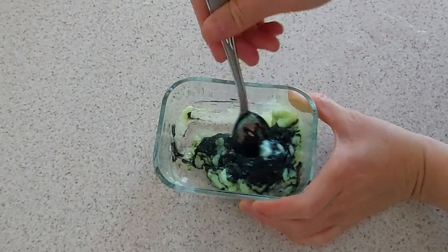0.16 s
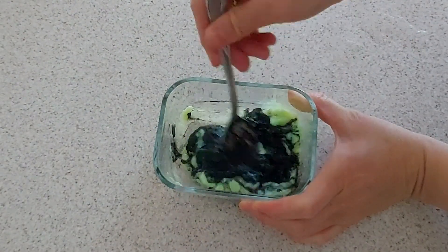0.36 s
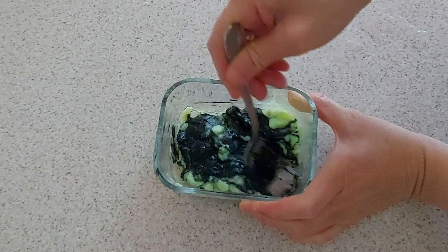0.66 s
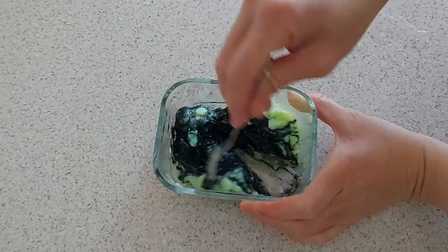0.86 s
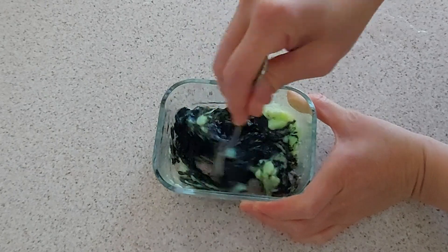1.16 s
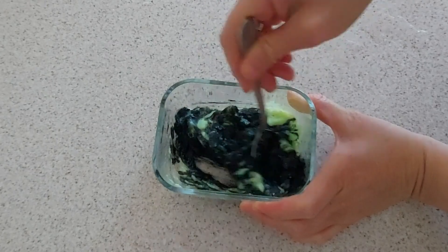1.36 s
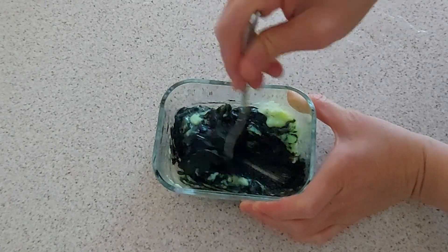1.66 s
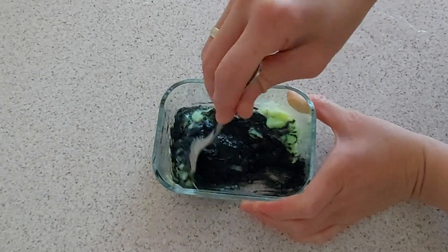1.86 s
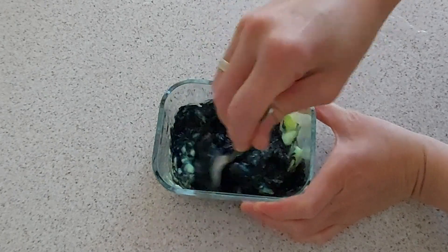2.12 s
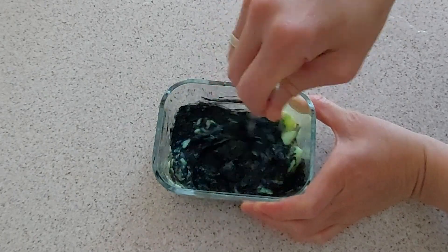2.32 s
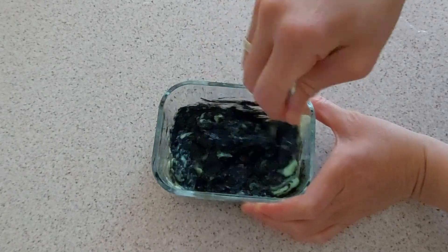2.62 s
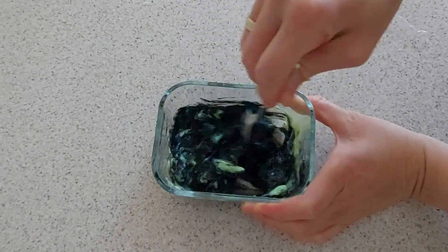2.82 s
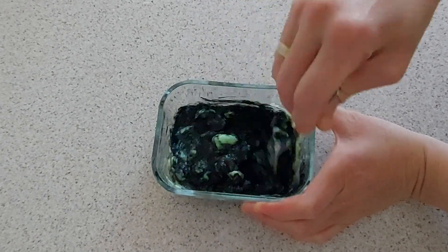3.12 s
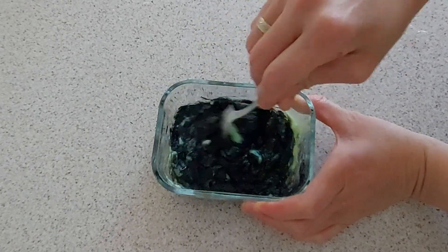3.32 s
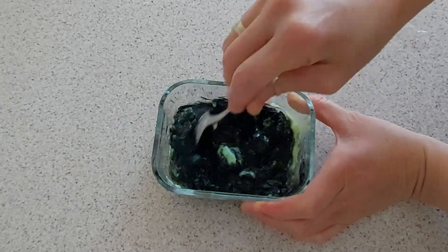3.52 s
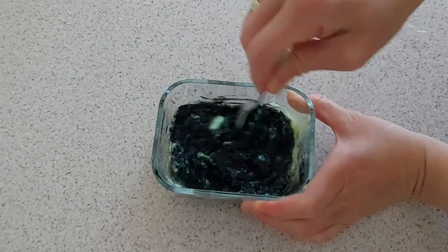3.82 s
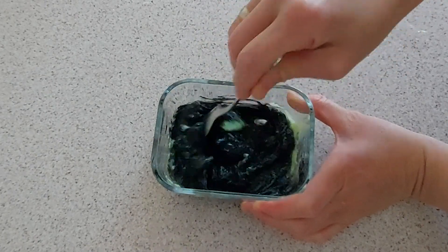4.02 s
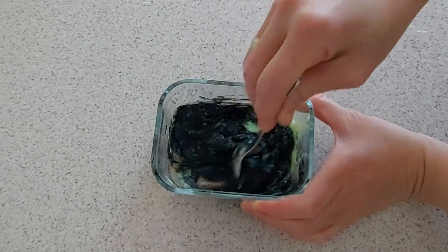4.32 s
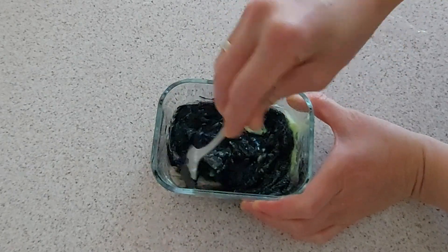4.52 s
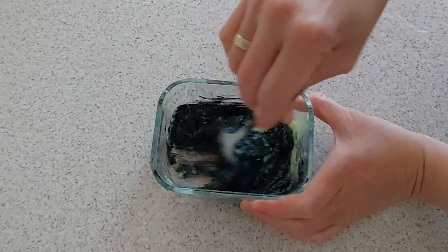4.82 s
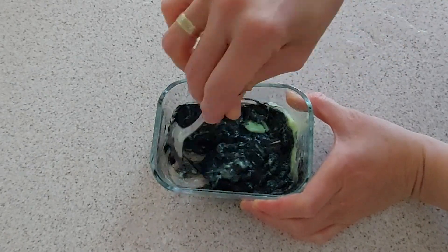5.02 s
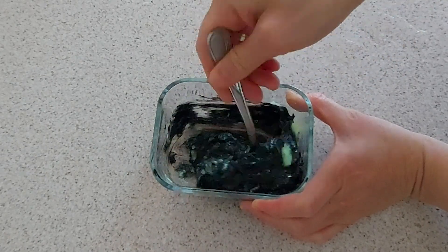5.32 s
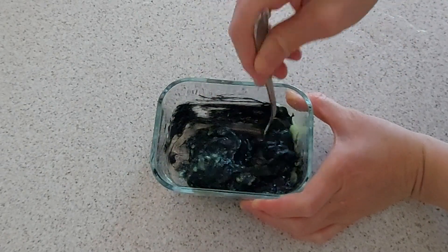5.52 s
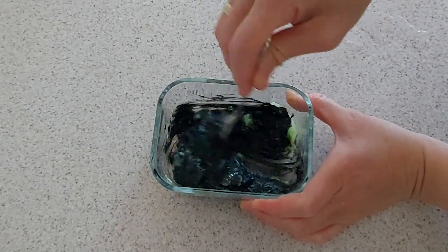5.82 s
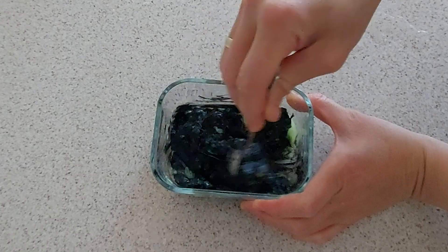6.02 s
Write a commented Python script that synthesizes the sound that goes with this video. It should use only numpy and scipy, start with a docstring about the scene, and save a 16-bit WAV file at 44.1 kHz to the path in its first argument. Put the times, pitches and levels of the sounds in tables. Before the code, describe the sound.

The squeaky tail of a knock fades first, then uneven spoon strikes clatter on heavy glass, dry and quickly damped by clinging paste. Bright hard taps alternate with woody bumps from the counter below. Small scraping squeals and tiny wet ticks slip between them. Stirring continues to the end, recorded closely in a small indoor room with soft low hum and rumble.

```python
"""A small quiet room with faint hum and rumble, and the squealing tail of a knock already dying away. A metal
spoon then stirs a soft paste in a thick glass dish that a hand holds on a kitchen counter. Knocks are noise
clatter, decaying modes and a thud on the counter; scrapes are gritty noise with a squeal. The strongest knocks
also send low noise thumps into the counter, and paste ticks are bright snaps; sparse random echoes make the
room. Two spaced microphones stand close by."""
import sys
import numpy as np
from scipy import signal
from scipy.fft import rfft, irfft, next_fast_len
from scipy.io import wavfile
from scipy.ndimage import uniform_filter1d

SR = 44100
rng = np.random.default_rng(int(sys.argv[2]) if len(sys.argv) > 2 else 0)


def materialize(psi):
    """Save the field psi as 16-bit PCM at rate SR to the path in sys.argv[1].

    A 1-D psi becomes a single channel; in a 2-D psi each row is a channel.
    """
    bounded = np.clip(np.atleast_2d(psi).T, -1, 1)
    quanta = np.round(bounded * 32767).astype(np.int16)
    wavfile.write(sys.argv[1], SR, quanta)


N = 272097  # length [samples]

# Modes of dish and spoon before the small random detuning: (frequency [Hz], part [index])
# parts: 0 long walls, 1 rim, 2 floor, 3 corners, 4 short walls of the dish, 5 spoon
MODE_PITCHES = [(2310, 0), (2372, 0), (4065, 1), (7960, 1), (6360, 4), (8700, 4), (10150, 4), (11200, 4),
                (4985, 5), (6950, 5), (14020, 4), (985, 2), (1382, 2), (1585, 2), (1738, 2), (3664, 3),
                (5557, 3)]
# The same modes in the same order: (relative level [dB], undamped time to fall 60 dB [s])
MODE_FADES = [(-8.5, 0.038), (-1.5, 0.054), (-3.5, 0.088), (-7, 0.12), (-2.5, 0.068), (-3.5, 0.044),
              (-10, 0.043), (-17, 0.025), (1, 0.073), (-6.5, 0.068), (-10, 0.034), (-13, 0.049), (4, 0.059),
              (4, 0.061), (0, 0.05), (-4.5, 0.059), (-15, 0.035)]
# Spectrum of the dense spoon-on-glass clatter: (frequency [Hz], relative level [dB per Hz])
CLATTER_SPECTRUM = [(120, -45), (200, -23), (600, -7), (1030, -6.5), (2330, -5), (3310, -11), (8490, -5),
                    (9480, -9), (11000, -3), (13700, -8), (16500, -26)]
# Spectrum of the counter under the pushed dish: (frequency [Hz], relative level [dB per Hz])
RUMBLE_SPECTRUM = [(20, -42), (40, -30), (55, -12), (70, 0), (100, 3), (160, -3), (240, -5.5), (400, -34.5)]

HUSH_DB, HUM_DB = -69, -68.5  # the hum's own level still wavers
BODY_DB, BODY_PER_THUD = -2.5, 0.55  # [dB], [dB per dB]: a blow aimed down at the counter has a fuller middle
SPOON_PER_BLOW = -0.28  # [dB per dB]: the spoon shows most in light taps
# Divisors of the ring times: a spoon that lands again soon and softer stays on the glass and mutes it
DAMPING, REBOUND_DAMPING = 1.175, 1.54
REBOUND_S = .1  # the longest gap before a rebound
KNOCK_PAN_DB = -0.16  # left minus right
GRIT_DB, GRITS_PER_S = 2.1, 3000  # mean size of a catch, mean number of catches
STROKE_FADE_DB = -1.5  # the edge bites first and eases off over the stroke
GRIP_S = 0.12  # the hand stills the dish: 20 dB more are gone after this time
# Short neighbours of each mode: level above it [dB], share of its t60, spread as a share of its pitch
BLUNT_DB, BLUNT_T60, BLUNT_SPREAD = 4, .3, 0.023
MIC_LOW_HZ, EDGE_HZ = 48.6, 16750  # bass and treble limits


def gain_of(db):
    """Decibels to amplitude."""
    return 10 ** (np.asarray(db) / 20)


def evened(x):
    """Scales to rms 1."""
    return x / np.sqrt(np.mean(x ** 2) + 1e-20)


def read(points, hz):
    """Reads a table on a log-frequency axis."""
    f, value = np.transpose(points)
    return np.interp(np.log(hz + 1), np.log(f + 1), value)


def add(mix, s, sound):
    """Mixes a two-channel sound in at time s."""
    part = mix[:, round(s * SR):][:, :sound.shape[1]]
    part += sound[:, :part.shape[1]]


def lumps(count, size, depth_db):
    """Smooth random gain, about size steps wide."""
    wander = evened(uniform_filter1d(rng.standard_normal(count), size=size))
    return gain_of(depth_db * wander)


def pair(count, level_db):
    """Noise at two spaced microphones, which agree in the bass only; level_db(hz) shapes it, rms is 1."""
    # Likeness of the left and right microphones: (frequency [Hz], likeness [0 to 1])
    likeness = [(60, 1), (300, 0.94), (700, 0.1), (2000, 0.045)]
    size = next_fast_len(count)
    hz = np.fft.rfftfreq(size, 1 / SR)
    left, other = rfft(rng.standard_normal((2, size)))
    same = np.clip(read(likeness, hz), 0, 1)
    right = same * left + np.sqrt(1 - same ** 2) * other
    noise = irfft(np.array([left, right]) * gain_of(level_db(hz)), size)
    return evened(noise[:, :count])


def dying(x, t60s):
    """Splits a noise into overlapping bands, each fading at its own speed."""
    count = x.shape[1]
    hz = np.fft.rfftfreq(count, 1 / SR)
    t = np.arange(count) / SR
    spectrum = rfft(x)
    centres = [f for f, _ in t60s]
    total = 0
    for weights, (_, t60) in zip(np.eye(len(t60s)), t60s):
        share = read(list(zip(centres, weights)), hz)
        total = total + irfft(spectrum * share, count) * gain_of(-60 * t / t60)
    return total


def background():
    """Steady room hush, rumble of the counter and a wavering two-tone hum that rises a little with it."""
    # Room hush: (frequency [Hz], relative level [dB per Hz])
    hush_spectrum = [(18, -48.5), (30, -35), (65, -18.5), (170, -8.5), (467, -21), (1620, -36.5),
                     (2100, -36.5), (9000, -45), (14100, -34), (16500, -49)]
    # Counter under the pushed dish: (time [s], level [dB])
    rumble_curve = [(0.0, -77), (1.576, -60.5), (1.962, -66), (2.651, -58), (5.121, -80), (6.17, -67)]
    # Centres of the two hum tones: [Hz]
    hum_pitches = [203, 250]

    def hum_tone_db(hz):
        power = sum(share / (1 + ((hz - f) / 3.) ** 4) for f, share in zip(hum_pitches, [1, .2]))
        return 10 * np.log10(power)

    rumble_db = np.interp(np.arange(N) / SR, *np.transpose(rumble_curve))
    hum_db = HUM_DB + .4 * (rumble_db - rumble_db.mean())
    hum = gain_of(hum_db) * pair(N, hum_tone_db) * lumps(N, size=6000, depth_db=3.0)
    rumble = gain_of(rumble_db) * pair(N, lambda hz: read(RUMBLE_SPECTRUM, hz))
    hush = gain_of(HUSH_DB) * pair(N, lambda hz: read(hush_spectrum, hz))
    return hush + hum + rumble


def spoon_ring(s):
    """Ring level of the spoon at time s: how freely it rings in the hand and the paste."""
    # Ring before any allowance for the blow or the slide: (time [s], level [dB])
    freedom = [(0.0, -44), (0.45, -45), (0.88, -25.5), (1.3, -42.5), (1.55, -40.5), (1.8, -28.5),
               (2.2, -23), (2.4, -42), (2.9, -30), (3.3, -18.5), (3.9, -27), (4.5, -28), (5.0, -31),
               (5.55, -51), (5.8, -19), (6.1, -29.5)]
    return np.interp(s, *np.transpose(freedom))


def grit(count):
    """Gain with sudden small catches of the edge that die in a few milliseconds."""
    sizes = gain_of(GRIT_DB * np.minimum(rng.exponential(1, count), 2.5))
    catches = sizes * (rng.random(count) < GRITS_PER_S / SR)
    keep = np.exp(-1 / (.0015 * SR))
    return evened(0.72 + signal.lfilter([1], [1, -keep], catches))


def patchy(x, depth_db):
    """Random gain in patches of pitch and time: the colour shifts as the spoon moves."""
    z = signal.stft(x, nperseg=256)[2]
    patches = uniform_filter1d(rng.standard_normal(z.shape[1:]), size=4, axis=0)
    patches = evened(uniform_filter1d(patches, size=6, axis=1))
    return signal.istft(z * gain_of(depth_db * patches), nperseg=256)[1][:, :x.shape[1]]


def scrape(length, pressure_db, treble_db, from_hz, to_hz, squeal_db, spoon_db):
    """Fine slips of the spoon's edge hiss, squeal in a gliding band and keep the modes singing."""
    # Ring of each part under a sliding edge, in part order; the spoon's adds to its curve: [dB]
    slide_levels = [-14, -9, -9.5, -5.5, -11, 24]
    count = round((length + .08) * SR)
    t = np.arange(count) / SR
    (hz, part), (db, _) = np.transpose(MODE_PITCHES), np.transpose(MODE_FADES)
    db = db + np.array(slide_levels)[part] + spoon_db * (part == part.max())

    def tone_db(f):
        peaks = gain_of(2 * db)[:, None] / (1 + (2 * (f - hz[:, None]) / 79.0) ** 2)  # 79 Hz wide
        broad = gain_of(2 * (read(CLATTER_SPECTRUM, f) - 13.5))
        treble = read([(2500, 0.0032), (9000, treble_db), (14000, treble_db - 3.0)], f)
        return 10 * np.log10(peaks.sum(0) + broad) + treble

    # a slow noise shifted up to the gliding pitch gives a fuzzy whistle
    fuzz = pair(count, lambda f: -10 * np.log10(1 + (f / 125.) ** 4))
    glide_hz = np.interp(t, [0, length], [from_hz, to_hz])
    squeal = fuzz * np.cos(2 * np.pi * np.cumsum(glide_hz) / SR)
    rub = patchy(pair(count, tone_db), depth_db=1.0)
    sound = rub + gain_of(squeal_db - 4.0) * squeal
    fade_db = STROKE_FADE_DB * t / length - 60 * np.maximum(t - length, 0) / .06
    stroke = np.clip(t / .0015, 0, 1) * gain_of(fade_db)
    uneven = grit(count) * lumps(count, size=700, depth_db=-2.0)
    return gain_of(pressure_db) * sound * uneven * stroke


def room(x):
    """Sparse echoes of random sign, one in every 20 samples, other ones for each microphone."""
    # Fading of the small room: (frequency [Hz], time to fall 60 dB [s])
    room_fades = [(200, 0.39), (1000, 0.22), (4000, 0.2), (14000, 0.15)]
    taps = np.zeros((2, 20000))
    at = np.arange(160, 19980, 20) + rng.integers(0, 20, (2, 991))
    np.put_along_axis(taps, at, rng.choice([-1., 1.], at.shape), 1)
    tail = dying(taps, room_fades)
    return signal.fftconvolve(x, tail / np.linalg.norm(tail[0]), axes=1)[:, :N]


def tick(level_db):
    """The paste lets go of the spoon: a tiny bright snap of noise, 60 dB down in 11 ms."""
    t = np.arange(512) / SR
    snap = pair(len(t), lambda hz: read([(2500, -30.0), (5000, -4), (14000, -2.5)], hz))
    return gain_of(level_db - 60 * t / 0.011) * snap


def knock_thump(level_db):
    """The low thump a strong knock sends into the counter: noise that swells, then dies."""
    t = np.arange(10240) / SR
    thump = pair(len(t), lambda hz: read(RUMBLE_SPECTRUM, hz))
    return thump * (1 - np.exp(-t / 0.026)) * gain_of(level_db - 60 * t / 0.16)


def rings(part_db, damping):
    """The clear modes; the clinging paste splits each into a beating, fluttering pair with a blunt neighbour."""
    # Left minus right microphone for each part, in part order: [dB]
    part_pan = [3, 0.5, 0.36, 0.66, 0.4, 0.3]
    (hz, part), (db, t60) = np.transpose(MODE_PITCHES), np.transpose(MODE_FADES)
    t = np.arange(3584) / SR
    # each spot wakes another mix of modes
    db = db + np.array(part_db)[part] + 1.5 * rng.standard_normal(len(hz))
    # three copies of each mode: the pair and the short blunt neighbour
    spread = np.array([[.003], [.005], [BLUNT_SPREAD]])
    hz = (hz * (1 + spread * rng.standard_normal((3, len(hz))))).ravel()
    part = np.r_[part, part, part]
    t60 = np.r_[t60, t60, BLUNT_T60 * t60]
    db = np.r_[db, db, db + BLUNT_DB]
    level = gain_of(db + np.outer([.5, -.5], np.array(part_pan)[part]))
    level = level * np.exp(2j * np.pi * rng.random(level.shape))  # own phases at each microphone
    decay = np.log(1000) * damping / t60[:, None]
    swing = np.exp((2j * np.pi * hz[:, None] - decay) * t)
    total = 0
    for k in range(len(part_db)):
        flutter = lumps(len(t), size=130, depth_db=3.5)
        total = total + (level[:, part == k] @ swing[part == k]).imag * flutter
    return total


def knock(blow_db, thud_db, treble_db, wall_db, rim_db, floor_db, corner_db, end_db, spoon_db, damping):
    """A dense clatter, the clear modes above it, and the thud of the dish on the counter."""
    # Thud modes before small random shifts: (frequency [Hz], level [dB], undamped time to fall 60 dB [s])
    thud_modes = [(394.1, -3, 0.24), (512.5, -13, 0.3), (678, -16.5, 0.3), (789, -17, 0.36)]
    # Fading of the clatter before damping: (frequency [Hz], time to fall 60 dB [s])
    clatter_fades = [(300, 0.31), (1500, 0.14), (5000, 0.037), (13000, 0.042)]
    t = np.arange(8192) / SR
    body_db = BODY_DB + BODY_PER_THUD * thud_db
    part_db = wall_db, rim_db, floor_db, corner_db, end_db, spoon_db + SPOON_PER_BLOW * blow_db

    bins = len(t) // 2 + 1
    spot = lumps(bins, size=150, depth_db=2.5)  # every spot on the glass has its own colour
    spot = spot * lumps(bins, size=25, depth_db=2.2)  # many small short modes
    colour = [(900, body_db + 12.0), (1900, body_db + 12.5), (3500, 0.014), (5000, 0.00063),
              (8000, treble_db + 2.5), (14000, treble_db + 6.5)]
    noise = pair(len(t), lambda hz: read(CLATTER_SPECTRUM, hz) + read(colour, hz) + 20 * np.log10(spot))
    crack = gain_of(-12.5 - 60 * t / 0.0064) * noise * (1 - np.exp(-t / 0.00026))  # the first contact
    # the spoon chatters after the touch
    rattle = noise * grit(len(t)) * lumps(len(t), size=150, depth_db=2.5)
    top = gain_of(-16.0) * dying(rattle, [(f, t60 / damping) for f, t60 in clatter_fades])
    add(top, 0, gain_of(-3.5) * rings(part_db, damping))
    top = crack + top * (1 - np.exp(-t / 0.0011))
    top = top * gain_of([[KNOCK_PAN_DB / 2], [-KNOCK_PAN_DB / 2]])

    lead = np.array([[0], [.6]])  # radians between the microphones
    # the dish sits a little differently each time: share of pitch, dB
    seat = rng.standard_normal((len(thud_modes), 2)) * [.008, 1.8]
    thud = 0
    for (f, db, t60), (shift, more_db) in zip(thud_modes, seat):
        swing = np.sin(2 * np.pi * f * (1 + shift) * t + lead)
        thud = thud + gain_of(db + more_db - 60 * damping * t / t60) * swing
    thud = gain_of(thud_db + 2.0 - 20 * (t / GRIP_S) ** 2) * thud
    thud = thud * (1 - np.exp(-t / 0.0069))  # the heavy dish takes time to rock
    thud = thud * lumps(len(t), size=900, depth_db=1.2)  # it rocks unevenly
    return gain_of(blow_db) * (top + thud * gain_of([[-1.5], [1.5]]))


def scene():
    """Scrapes, ticks, knock thumps and knocks in the room over the background."""
    # Spoon edge on the glass, after two rows for the opening tail of a knock: (time [s], length [s],
    # pressure [dB], treble [dB], squeal from [Hz], squeal to [Hz], squeal before a common trim [dB])
    scrape_list = [(0.0, 0.032, -46.5, -9, 2940, 2800, 6.5), (0.001, 0.044, -60, -12, 1628, 1620, 11.5),
                   (0.469, 0.061, -44.5, 5, 3290, 3730, -7), (0.688, 0.03, -42, 1, 2497, 2400, 1),
                   (2.232, 0.089, -49, -33, 1600, 1600, 7), (2.301, 0.041, -45, 23, 2440, 2390, 6),
                   (2.652, 0.047, -47, -21.5, 2900, 2850, 7), (2.746, 0.011, -28.5, -11, 3020, 3000, 5.5),
                   (3.026, 0.032, -52.5, -11, 2280, 2410, -1), (3.088, 0.077, -48, -14, 2446, 2350, -3),
                   (3.115, 0.051, -55, -22, 1468, 1200, 6), (3.314, 0.045, -54.5, -13, 1510, 1800, 12),
                   (3.378, 0.067, -44.5, -16, 2350, 2650, -3.5), (3.553, 0.042, -57, -14, 1646, 1600, 10),
                   (3.603, 0.081, -43, -10, 1500, 980, -0.5), (3.625, 0.096, -51.5, -25.5, 2520, 2850, 5.5),
                   (3.718, 0.062, -53, 0, 801, 430, 11.5), (3.735, 0.075, -47.5, -10, 2620, 2400, -2),
                   (3.977, 0.077, -45, -15.5, 2320, 2400, -18), (4.598, 0.032, -42.5, -11, 2670, 3040, -2),
                   (4.832, 0.032, -44, -9.5, 1632, 1679, 7), (5.047, 0.049, -55.5, -1, 2360, 2350, -6),
                   (5.158, 0.062, -47.5, -1, 2300, 2370, 3.5), (5.21, 0.032, -51.5, -6, 2720, 2970, 13.5),
                   (5.258, 0.053, -56, -15, 1418, 1700, -9), (5.792, 0.04, -46, 1, 1530, 1603, 3.5),
                   (6.054, 0.039, -48.5, -5, 2320, 2340, 3)]
    # Paste letting go of the spoon: (time [s], level [dB])
    tick_list = [(0.2404, -46), (0.3544, -50), (1.849, -42), (4.2153, -57), (4.2305, -54.5)]
    # Low thumps of the strongest knocks in the counter: (time [s], level [dB])
    thump_list = [(0.293, -40), (0.642, -36.5), (0.895, -33.5), (1.129, -33.5), (1.383, -35.5),
                  (2.395, -40.5), (2.47, -36), (2.731, -28.5), (3.96, -31.5), (4.561, -36), (5.573, -30.5),
                  (5.766, -40.5)]
    # Spoon on the dish: (time [s], blow [dB], then before common trims, against the blow: thud on the
    # counter [dB], treble [dB], ring of long walls [dB], rim [dB], floor [dB], corners [dB], short walls [dB])
    knock_list = [(0.292, -9.5, -28.5, -4.5, -35.5, -35, -31, -29, -38),
                  (0.4425, 6, -47, -13.5, -31.5, -30, -30, -13, -20.5),
                  (0.643, 2.5, -40, -9, -17, -17.5, -31.5, -37.5, -14),
                  (0.876, 2.5, -33.5, -1.5, -12, -18.5, -29.5, -28, -20),
                  (0.894, 2.5, -26, -11.5, -18, -27, -21.5, -16, -21),
                  (1.131, -5, -19, -5, -28.5, -26, -31.5, -58, -38),
                  (1.328, -13.5, -47, -10, -26.5, -32, -29.5, -29.5, -13.5),
                  (1.343, -20.5, -43.5, -15.5, -23.5, -23.5, -40, -21.5, -12),
                  (1.382, -9, -26.5, -6, -35, -45, -17.5, -49, -49),
                  (1.549, 3.5, -36.5, -3, -30.5, -37, -29.5, -34.5, -38.5),
                  (1.719, 2.5, -44.5, -7.5, -11.5, -14, -25.5, -24, -16),
                  (1.7895, -9, -40, -9.5, -14.5, -43, -35, -33, -37),
                  (2.104, 5.5, -49, -8, -19.5, -24, -32, -30, -28.5),
                  (2.199, -7.5, -20.5, -13, -28.5, -18.5, -28, -13.5, -40.5),
                  (2.283, 4, -39, -7.5, -16.5, -19, -31, -39, -20),
                  (2.395, -8, -21, -13.5, -31, -27, -21, -16.5, -41),
                  (2.469, -8.5, -26.5, -11, -46, -42, -21.5, -20, -40.5),
                  (2.597, -2, -31, -5, -13.5, -44.5, -32, -13, -40),
                  (2.652, -20.5, -14.5, -13.5, -10.5, -25, -30, -48, -27),
                  (2.731, 6, -36.5, -4, -26.5, -30.5, -31, -13.5, -39.5),
                  (2.7495, -4, -27, -4, -17, -29, -22, -28, -25.5),
                  (2.928, -2.5, -32.5, -9, -21, -28, -28, -35, -51),
                  (3.087, -34, -22.5, -25.5, -6, -26, -33, -23.5, -33),
                  (3.204, -1, -32.5, -10, -16, -24, -23, -15, -19),
                  (3.221, -15, -17.5, -4, -21, -22, -34, -40, -27),
                  (3.299, -13, -21, -17, -28, -22, -31, -22, -40),
                  (3.526, -8, -24, -13, -27, -28, -25.5, -18, -59),
                  (3.83, 1, -33, 0, -9.5, -28, -30, -11, -46),
                  (3.913, -7, -23, -14.5, -41, -26.5, -20.5, -34, -36),
                  (3.96, -1, -33.5, -11.5, -13.5, -24, -21.5, -39, -44),
                  (4.286, -23, -43, -12, -21, -41, -38.5, -41, -19),
                  (4.308, -28.5, -1.5, -18, -31.5, -34, 5, -38.5, -39),
                  (4.316, 5.5, -30, -10, -35, -42.5, -40, -17, -23.5),
                  (4.53, -12.5, -32.5, -4, -42.5, -45.5, -33.5, -42, -35),
                  (4.561, -2.5, -20, -13.5, -43, -33, -22, -14, -27),
                  (4.773, -13, -31, 1.5, -33, -52, -51.5, -60, -28),
                  (4.801, -20.5, -13, -20, -52, -48, -10.5, -47, -45),
                  (5.032, -11, -30, -0.5, -20, -48, -52, -30, -21.5),
                  (5.116, 0.5, -34, 2, -17, -22, -22, -16.5, -34),
                  (5.133, -11.5, -22.5, -24, -25, -16, -30, -16, -35),
                  (5.364, -33, -30.5, -16, -13, -18.5, -14.5, -12, -25),
                  (5.574, -0.5, -25, -12, -18, -33.5, -30.5, -56, -45),
                  (5.767, 5.5, -46.5, 5, -28, -32.5, -43.5, -31, -25.5),
                  (6.019, -2.5, -36.5, 1.5, -14, -19, -30, -22.5, -17),
                  (6.032, -16, -20, -20, -10, -20, -54, -47, -15)]
    spoon = np.zeros((2, N))
    for s, *row in scrape_list:
        add(spoon, s, scrape(*row, spoon_ring(s)))
    for s, level_db in tick_list:
        add(spoon, s, tick(level_db))
    for s, level_db in thump_list:
        add(spoon, s, knock_thump(level_db))
    # time and dB since the knock before
    steps = np.diff(np.array(knock_list)[:, :2], axis=0, prepend=-1)
    for (s, *row), (gap, rise_db) in zip(knock_list, steps):
        damping = REBOUND_DAMPING if gap < REBOUND_S and rise_db < 0 else DAMPING
        # every knock starts 1.7 ms after its listed time
        add(spoon, s + 0.0017, knock(*row, spoon_ring(s), damping))
    return spoon + gain_of(-11.0) * room(spoon) + background()


def record(dry):
    """The microphones lose the deepest bass and the loudest peaks are softly squeezed; then the band limit."""
    thinned = signal.sosfilt(signal.butter(2, MIC_LOW_HZ, "highpass", fs=SR, output="sos"), dry)
    squeezed = .95 * np.tanh(thinned / .95)
    band_limit = signal.firwin(255, EDGE_HZ, window=("kaiser", 9), fs=SR)
    return signal.oaconvolve(squeezed, band_limit[None], "same")


dry = scene()
out = record(dry)
materialize(out)
```